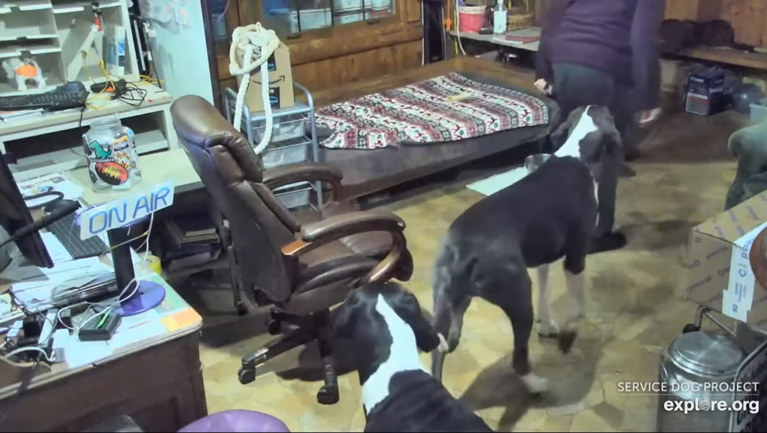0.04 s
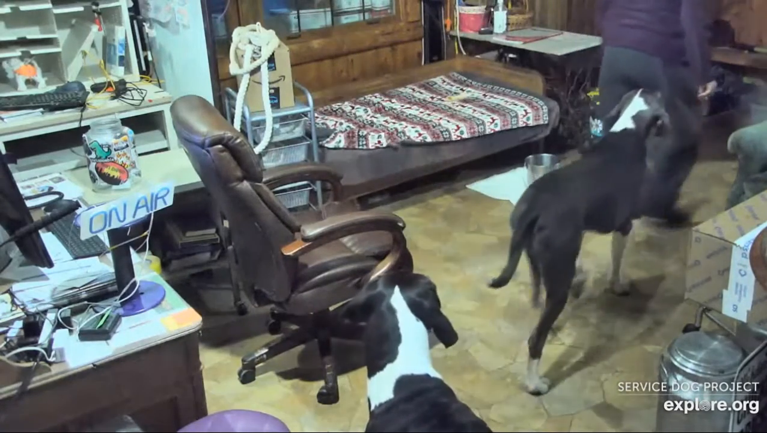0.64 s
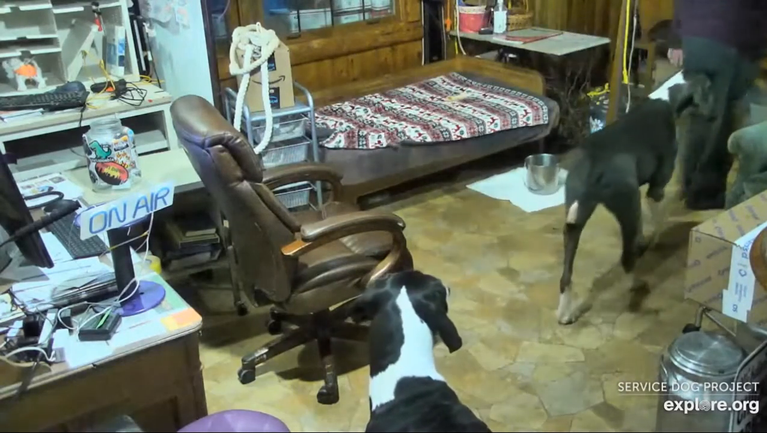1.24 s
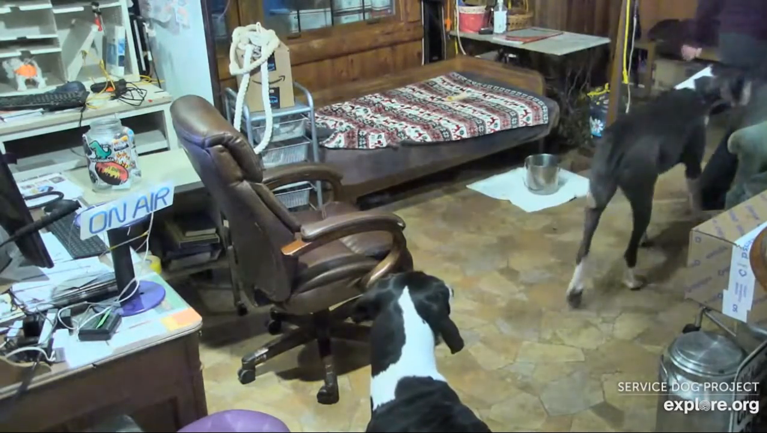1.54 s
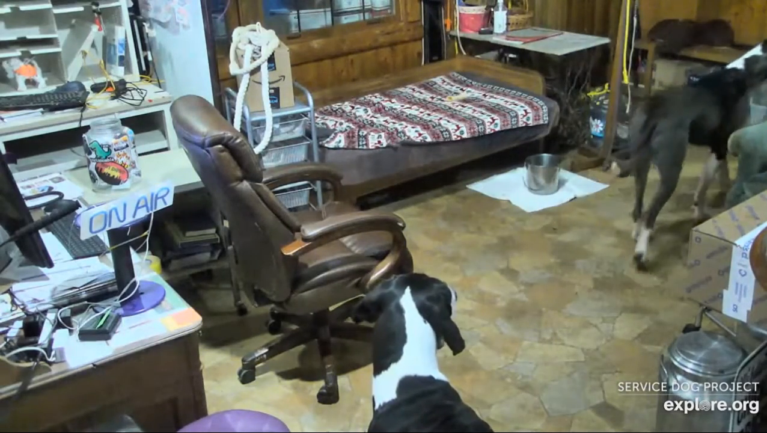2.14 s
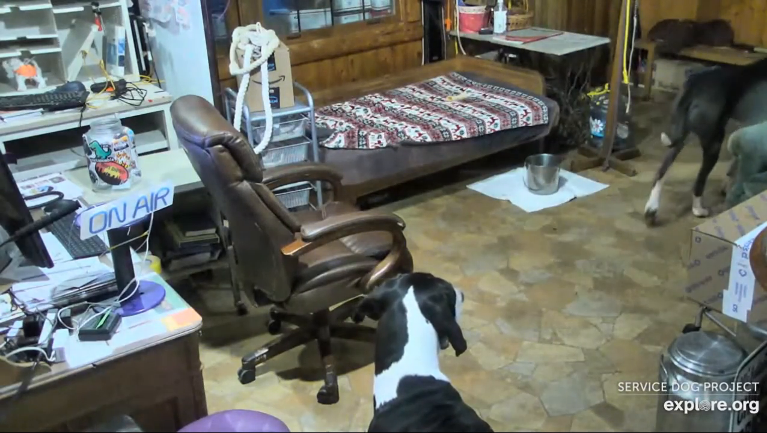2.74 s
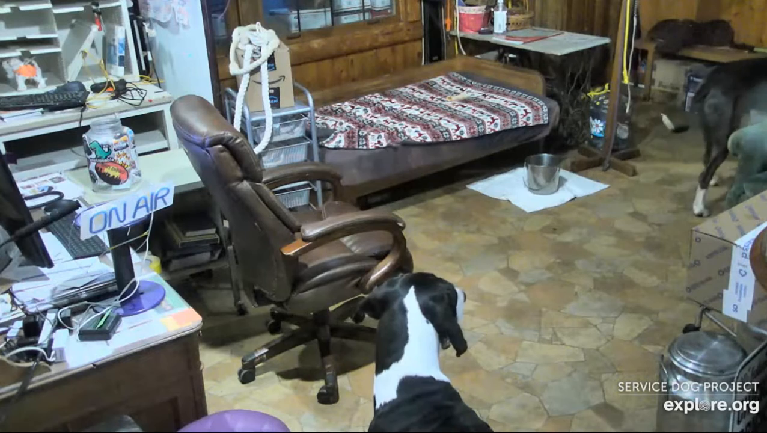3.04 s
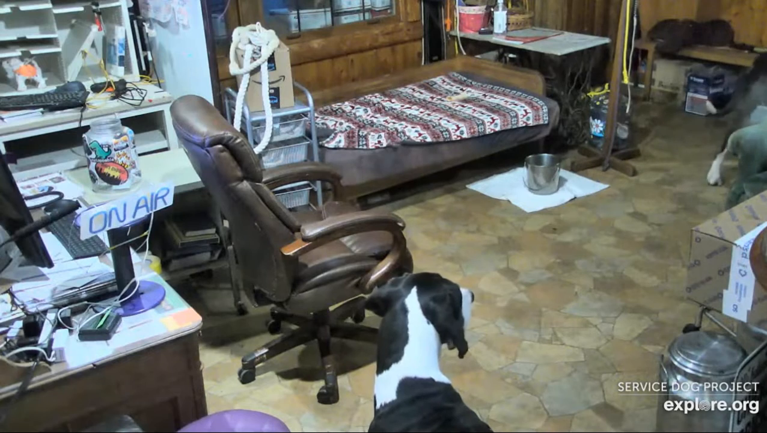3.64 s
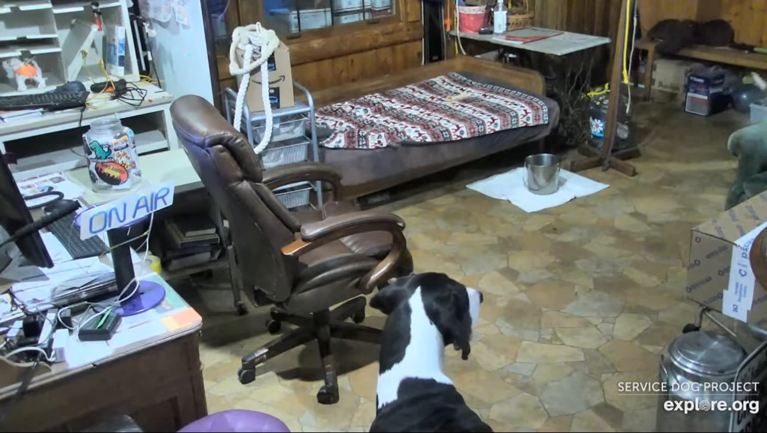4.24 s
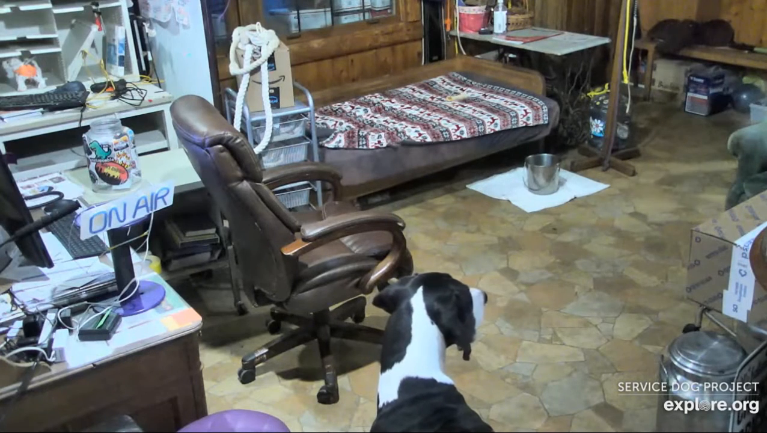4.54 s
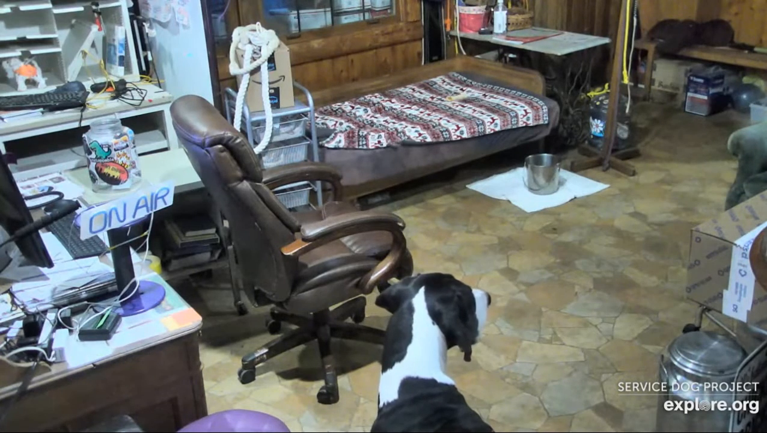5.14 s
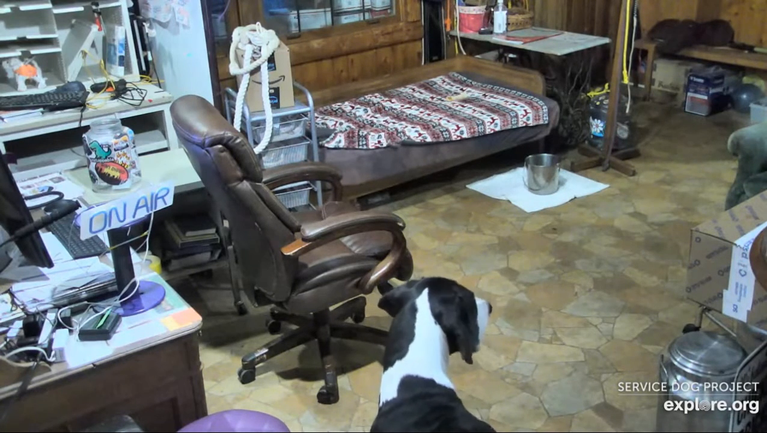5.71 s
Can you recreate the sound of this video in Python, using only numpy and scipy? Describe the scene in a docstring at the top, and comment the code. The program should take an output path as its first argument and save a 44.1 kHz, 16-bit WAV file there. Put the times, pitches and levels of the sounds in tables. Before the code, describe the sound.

A loud, even static hiss runs over a steady low electrical hum and a faint fluttering rumble.

```python
"""A loud, even, nearly white hiss: the noise of a fixed camera's audio input in an empty room.
Under it lies a steady low hum, a harmonic series that dips briefly a few times, with a
fluttering rumble around its two lowest partials. Three soft, low blips pass.
The whole signal rides on a constant offset and is band-limited."""
import sys
import numpy as np
from scipy import signal
from scipy.fft import rfft, irfft
from scipy.io import wavfile

SR = 44100
rng = np.random.default_rng(int(sys.argv[2]) if len(sys.argv) > 2 else 0)


def waveform_to_disk(signal):
    """Save audio, clipped to [-1, 1], as 16-bit WAV at the path in sys.argv[1]."""
    frames = np.transpose(np.atleast_2d(signal))
    scaled = np.clip(frames, -1, 1) * 32767
    samples = np.round(scaled).astype(np.int16)
    wavfile.write(sys.argv[1], SR, samples)


N = 263277


def gain_of(db):
    """The amplitude ratio for a level in decibels."""
    return 10 ** (np.asarray(db) / 20)


def unit_rms(x):
    """Normalisation to an rms of 1."""
    return x / np.sqrt(np.mean(x ** 2) + 1e-20)


def bell(centre_s, half_width_s):
    """A Gaussian pulse of height 1, down to 1/e at half_width_s from its centre."""
    return np.exp(-((np.arange(N) / SR - centre_s) / half_width_s) ** 2)


def noise(spectrum):
    """Spectral shaping: white noise weighted by (Hz, dB) points on a log-frequency axis; rms 1."""
    hz = np.fft.rfftfreq(N, 1 / SR)
    points_hz, db = np.transpose(spectrum)
    colour = gain_of(np.interp(np.log(hz + 1), np.log(points_hz + 1), db))
    return unit_rms(irfft(rfft(rng.standard_normal(N)) * colour, N))


def drift(rate_hz):
    """Low-pass noise: a zero-mean random curve of rms 1, varying mostly slower than rate_hz."""
    hz = np.fft.rfftfreq(N, 1 / SR)
    low_pass = (hz > 0) / (1 + (hz / rate_hz) ** 4)
    return unit_rms(irfft(rfft(rng.standard_normal(N)) * low_pass, N))


# Soft low blips. Each row: centre in seconds, envelope peak in dB, frequency in Hz.
TONE_BURSTS = [(.868, -46.5, 217), (1.632, -51, 203), (5.578, -46, 200)]

def blips():
    """Tone bursts: a few cycles of a sinusoid under a Gaussian envelope."""
    t = np.arange(N) / SR
    bursts = np.zeros(N)
    for centre_s, db, hz in TONE_BURSTS:
        envelope = gain_of(db) * bell(centre_s, half_width_s=0.0081)
        bursts += envelope * np.sin(2 * np.pi * hz * (t - centre_s))
    return bursts


# The rumble's spectrum. Each row: frequency in Hz, relative spectral density in dB.
RUMBLE_SPECTRUM = [(4, -7), (20, -19), (34, -2), (45, -4), (55, -2.5), (65, -13), (76, -6.5), (88, 0.5),
                   (102, 0), (122, -8.5), (146, -15.5), (165, -33), (240, -38.5), (300, -46)]

def rumble(level_db=-50.5, flutter_db=1.5):
    """Random amplitude modulation makes two humps of low noise flutter."""
    low_noise = noise(RUMBLE_SPECTRUM)
    flutter = gain_of(flutter_db * drift(rate_hz=7.6))
    return gain_of(level_db) * unit_rms(low_noise * flutter)


# The hum's partials. Each row: harmonic number, rms level in dB.
HUM_HARMONICS = [(1, -43), (2, -50), (3, -68), (4, -76), (5, -81.5)]
# Brief dips in the hum. Each row: centre in seconds, change of level in dB.
HUM_DIPS = [(1.8, -5), (3.61, -11), (5.02, 0), (5.22, -6)]

def hum(fundamental_hz=43.066):
    """Superposed harmonics form a rounded sawtooth of fixed pitch, whose level dips briefly."""
    phase = 2 * np.pi * fundamental_hz * np.arange(N) / SR
    wave = -sum(gain_of(db) * np.sqrt(2) * np.sin(k * phase) for k, db in HUM_HARMONICS)
    dip_db = sum(db * bell(centre_s, half_width_s=0.049) for centre_s, db in HUM_DIPS)
    return wave * gain_of(dip_db)


# The hiss, nearly flat above a steep edge. Each row: frequency in Hz, relative spectral density in dB.
HISS_SPECTRUM = [(220, -35), (280, -21.5), (350, -1.5), (420, 0.5), (1000, 0), (4000, -0.87), (9200, -1.5),
                 (13300, -3), (15600, -6)]
# The flickering band at that lower edge. Each row: frequency in Hz, relative spectral density in dB.
FRINGE_SPECTRUM = [(200, -53), (250, -15), (282, 1.5), (330, 2), (400, -13.5), (600, -56)]

def hiss(level_db=-40.5, fringe_db=-61):
    """Stationary broadband noise of the input amplifier, plus a separate band at its lower edge that flickers."""
    sharpness, bias = 1.57, 0.57  # a positive bias keeps the fringe on more often than off
    presence = 1 + np.tanh(sharpness * drift(rate_hz=7.6) + bias)
    steady = gain_of(level_db) * noise(HISS_SPECTRUM)
    fringe = gain_of(fringe_db) * unit_rms(presence * noise(FRINGE_SPECTRUM))
    return steady + fringe


def scene():
    """Linear superposition of the four layers in one channel."""
    return (hiss() + hum() + rumble() + blips())[None]


def record(dry):
    """The input adds a DC offset; a linear-phase low-pass filter then limits the bandwidth."""
    dc_offset, cutoff_hz = -0.4936, 15720
    taps = signal.firwin(1023, cutoff_hz, window=("kaiser", 9), fs=SR)
    margin = len(taps) // 2
    padded = np.pad(dry + dc_offset, ((0, 0), (margin, margin)), mode="reflect")
    return signal.oaconvolve(padded, taps[None], "valid")


dry = scene()
out = record(dry)
waveform_to_disk(out)
```